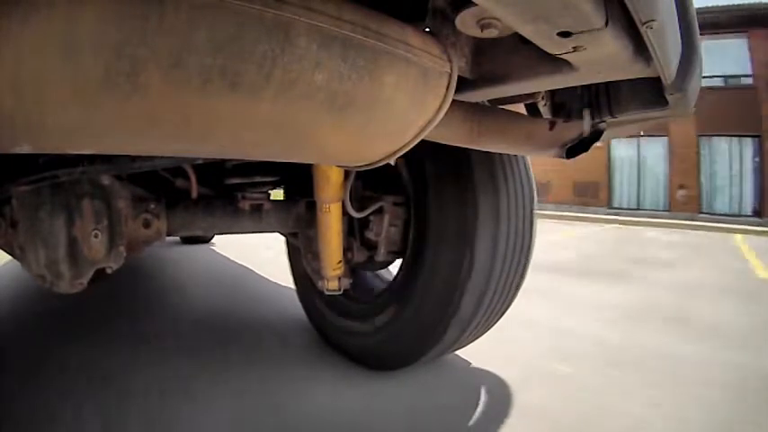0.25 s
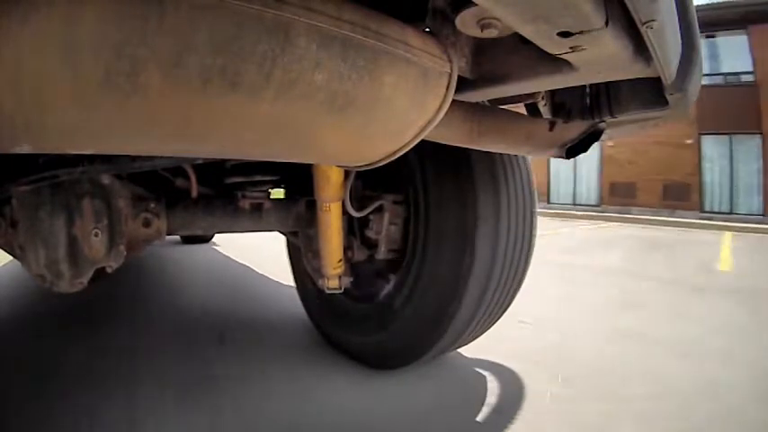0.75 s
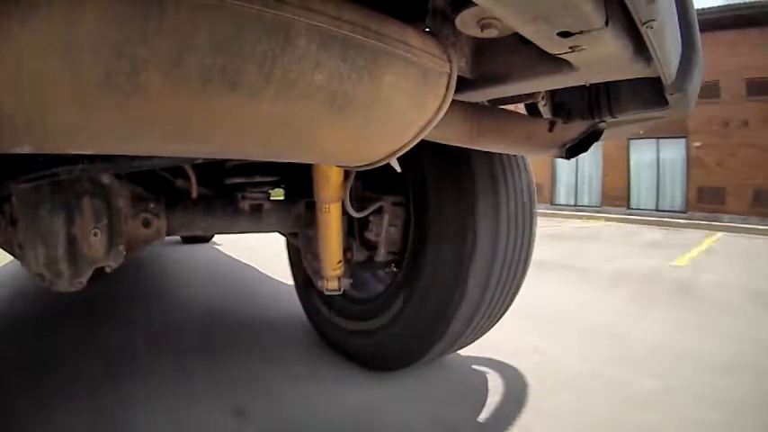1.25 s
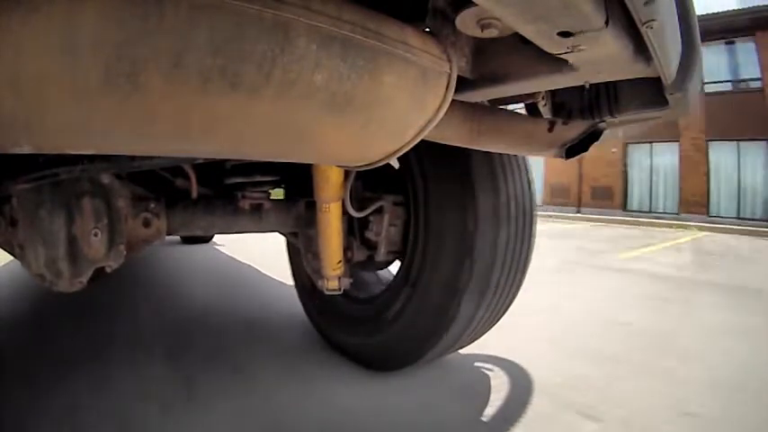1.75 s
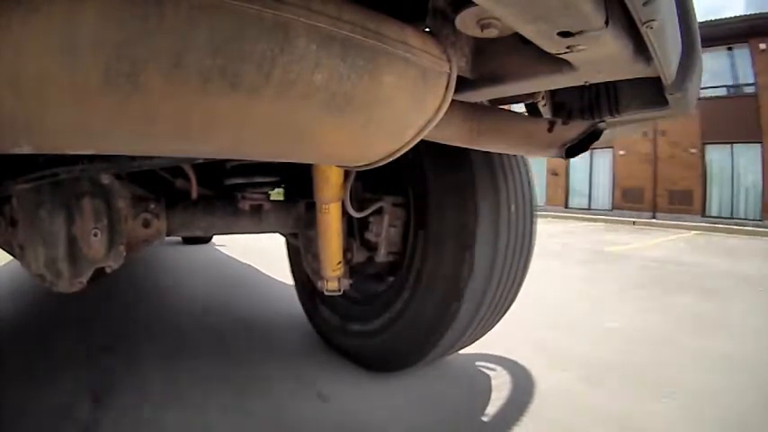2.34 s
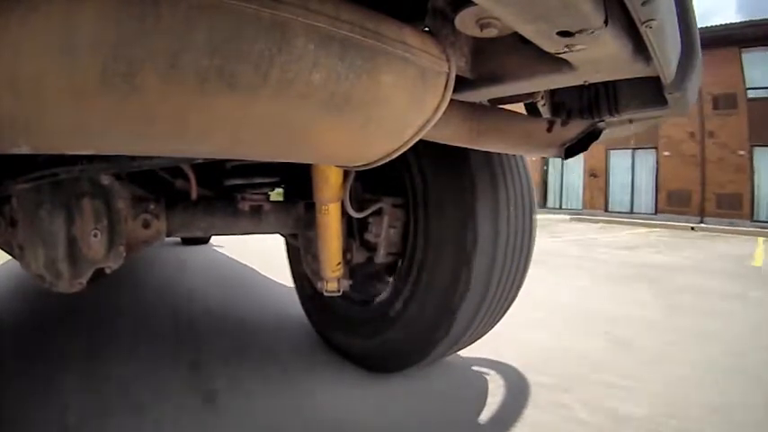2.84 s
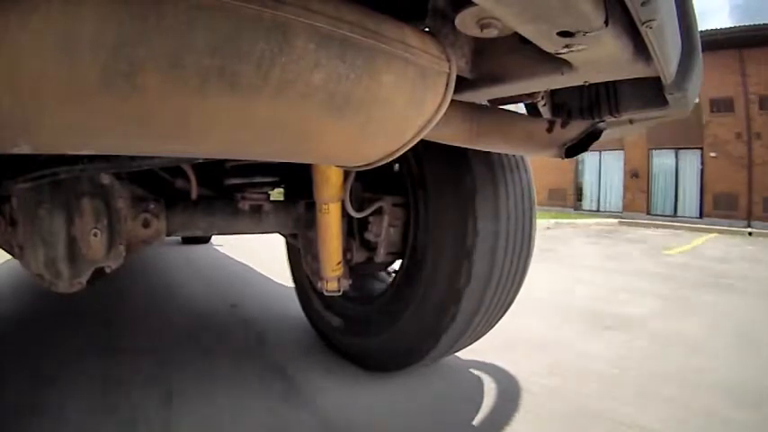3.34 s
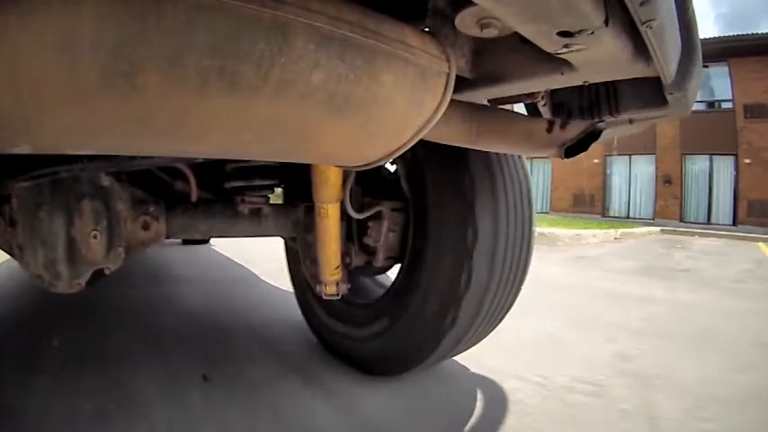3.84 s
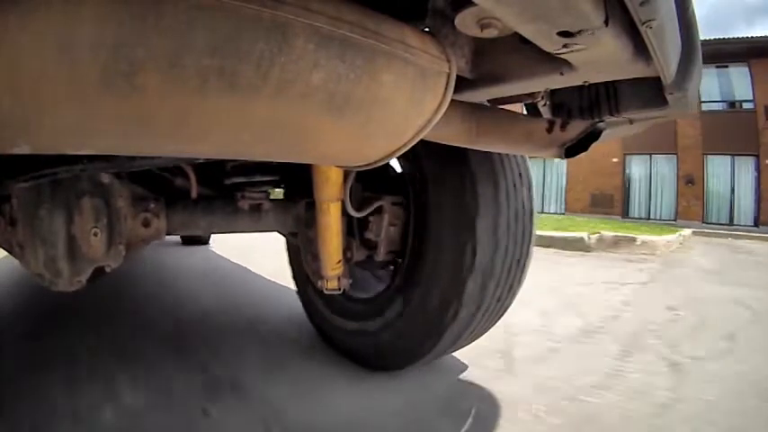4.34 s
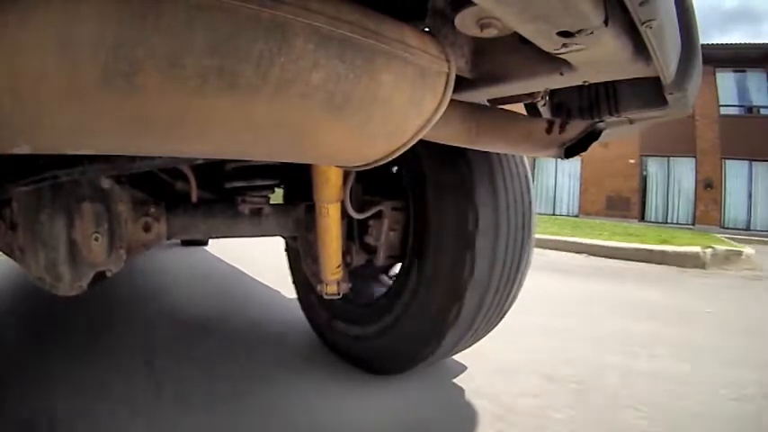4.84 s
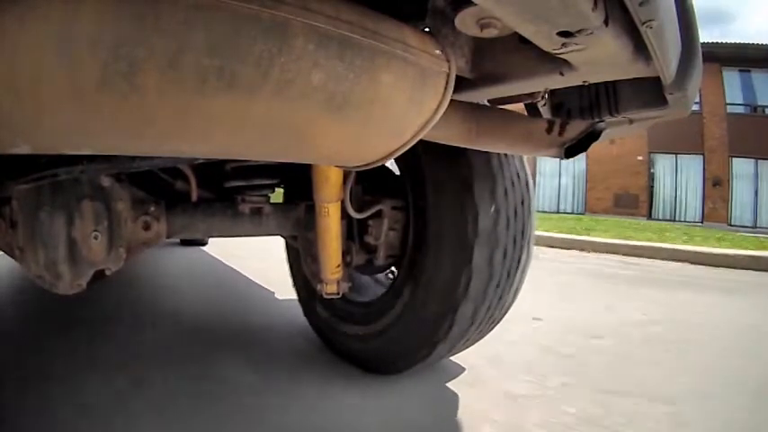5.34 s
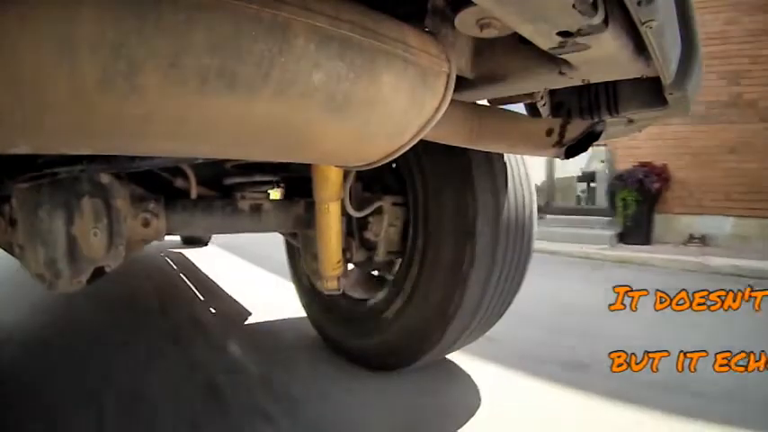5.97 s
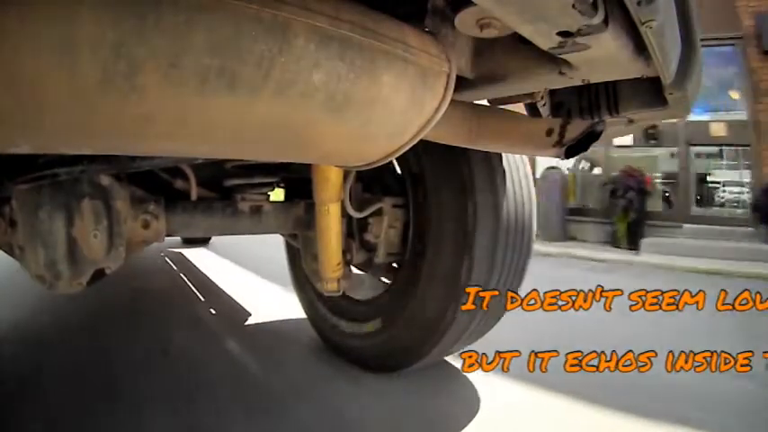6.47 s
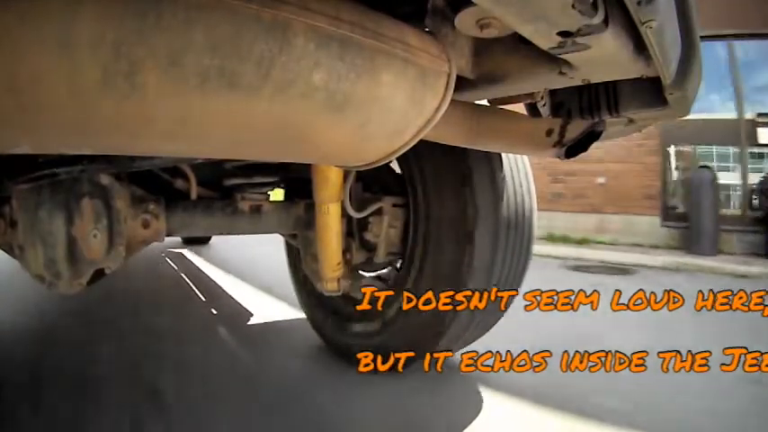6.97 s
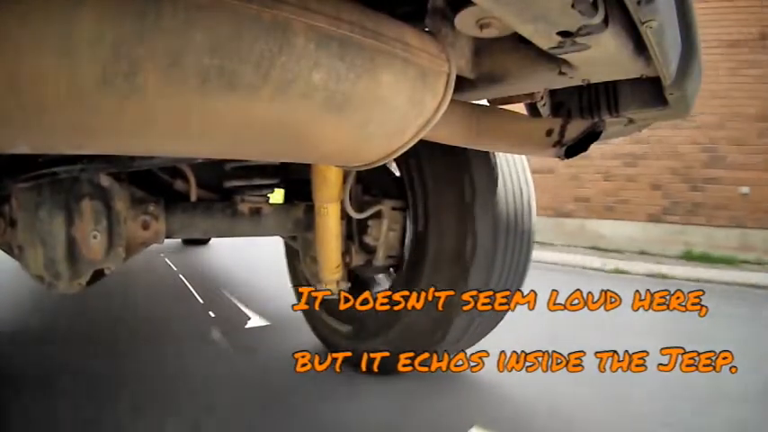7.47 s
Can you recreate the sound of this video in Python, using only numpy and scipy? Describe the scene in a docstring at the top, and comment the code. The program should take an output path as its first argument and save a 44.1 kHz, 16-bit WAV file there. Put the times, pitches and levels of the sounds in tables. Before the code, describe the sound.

An off-road car rolls slowly over pavement, heard from a microphone close under its rear. The exhaust throbs low while the underbody hums and booms, and the tyres hiss with grit. A faint gear whine comes and goes. Loose suspension joints knock and clank, first after about a second, hardest just before two seconds, then in scattered groups, with a longer run near the end.

```python
"""A slowly rolling off-road car, close up, from a camera microphone clamped under its rear.
From the start road shake booms in axle and silencer and sings in the narrow resonances of the camera
bracket; the exhaust throbs low, the tyres hiss with grit and a faint gear whine comes and goes.
Loose suspension joints knock over the bumps: first at 1 s, hardest just before 2 s, then in scattered
groups, with a longer run from 5.6 to 7 s."""
import sys
import numpy as np
from scipy import signal
from scipy.fft import rfft, irfft, next_fast_len
from scipy.io import wavfile

SR = 44100
rng = np.random.default_rng(int(sys.argv[2]) if len(sys.argv) > 2 else 0)


def inscribe(sig):
    """Save sig as 16-bit PCM at rate SR to the path in sys.argv[1].

    A 1-D sig is mono; a 2-D sig holds one channel per row.
    Samples are clipped to [-1, 1] before scaling.
    """
    pcm = np.round(np.clip(np.atleast_2d(sig).T, -1, 1) * 32767)
    wavfile.write(sys.argv[1], SR, pcm.astype(np.int16))


N = 339570

# slow levels as road and speed change: time_s, tyre_roar_db, silencer_hum_db, axle_boom_db, grit_db
ROAD_LEVELS = [(0.0, -49, -43.5, -45.5, -65), (0.58, -49, -45.5, -50, -66), (1.22, -50, -48, -51, -67.5),
               (1.52, -49.5, -46.5, -50, -69), (1.91, -50.5, -50.5, -50, -68),
               (2.38, -50.5, -49, -52.5, -67), (2.7, -51.5, -52.5, -50.5, -66.5), (3.3, -52, -48, -54, -68),
               (4.05, -52.5, -46.5, -50.5, -67), (4.8, -53.5, -51.5, -52, -66),
               (6.46, -51, -49.5, -52, -67), (6.75, -52.5, -56.5, -57.5, -67),
               (7.31, -51.5, -53.5, -50, -64.5), (7.7, -53.5, -42.5, -55, -69.5)]
# resonances of the camera bracket: pitch_hz, width_hz, gain_db
BRACKET_MODES = [(1093, 81, -0.5), (1124, 27, 4.5), (1634, 62, -13.5), (1941, 59, 0), (2091, 58, -1),
                 (2494, 129, 2.5), (2718, 38.4, 2), (2864, 128, -4.5), (3386, 97, -6.5), (3776, 79, 0),
                 (3980, 1080, -11.5), (4663, 115, 0.5), (5697, 78, -8.5), (7040, 93, -14.5)]
# resonances of the suspension joints: pitch_hz, width_hz, gain_db
JOINT_MODES = [(333, 77, 6.5), (362.5, 20, 3), (482, 62, -3.5), (533.4, 13.6, 7.5), (576, 23, -0.5),
               (658, 19, 1.5), (709, 23, -0.5)]


def amp(db):
    return 10 ** (np.asarray(db) / 20)


def unit_rms(x):
    return x / np.sqrt(np.mean(x ** 2) + 1e-20)


def curve(rows, column):
    """One column of a table, joined by straight lines in time."""
    table = np.transpose(rows)
    return np.interp(np.arange(N) / SR, table[0], table[column])


def swells(rows, column):
    """Bell-shaped rises in dB about each peak."""
    t = np.arange(N) / SR
    return sum(row[column] * np.exp(-((t - row[0]) / max(row[1], .01)) ** 2) for row in rows)


def wander(rate_hz):
    """Random drift of rms 1, mostly slower than rate_hz."""
    return unit_rms(signal.lfilter(*signal.butter(2, rate_hz, fs=SR), rng.standard_normal(N)))


def coloured(x, spectrum):
    """Filters x by a spectrum scaled to an rms gain of 1."""
    size = next_fast_len(N)
    bin_hz = np.fft.rfftfreq(size, 1 / SR)
    hz, db = np.transpose(spectrum)
    gain = amp(np.interp(np.log(bin_hz + 1), np.log(hz), db))
    return irfft(rfft(x, size) * unit_rms(gain), size)[:N]


def ring(x, modes):
    """Sum of damped resonances (pitch_hz, width_hz, gain_db); white noise keeps about its rms."""
    out, power = np.zeros(len(x)), 0
    for k, (hz, width, db) in enumerate(modes):
        radius = np.exp(-np.pi * width / SR)
        pole = radius * np.exp(2j * np.pi * hz / SR)
        out += (-1) ** k * amp(db) * 2 * signal.lfilter([1 - radius], [1, -pole], x).imag
        power += amp(db) ** 2 * 2 * (1 - radius) / (1 + radius)
    return out / np.sqrt(power)


def add(mix, start_s, sound):
    part = mix[round(start_s * SR):][:len(sound)]
    part += sound[:len(part)]


def gear_whine(pitch_hz=701, base_db=-77):
    """A thin tone from the final drive, wavering with the load."""
    # the whine comes forward: peak_s, half_width_s, rise_db
    rises = [(0.08, .06, 12), (0.41, .06, 13), (0.96, 0.069, 16), (1.1, 0.06, 12), (5.79, 0.14, 13),
             (6.15, .08, 12), (6.52, 0.076, 7), (6.78, .08, 12)]
    cycles = np.cumsum(pitch_hz * (1 + 0.00592 * wander(rate_hz=5.16))) / SR
    level_db = base_db + swells(rises, column=2) + 2.2 * wander(rate_hz=6.6)
    return amp(level_db) * np.sin(2 * np.pi * cycles)


def grit(small_spurts_per_s=4.5, small_spurt_db=-67, rise_s=0.0037, fall_s=0.013):
    """Sand under the tread: a hiss that flutters and spurts, low and high treble partly on their own."""
    # spectrum of the hiss: frequency_hz, density_db
    hiss_spectrum = [(3000, -16.5), (6000, 1.5), (8000, 1.5), (8500, 3), (9200, -1.5), (10000, 1),
                     (10600, -3.5), (13000, -7.5), (13800, -6), (14200, -2.5), (14700, -22.5), (15500, -14)]
    # loudest spurts of sand: start_s, strength_db
    loud_spurts = [(0.3302, -66), (0.6185, -57), (1.7145, -56), (1.8717, -52), (2.2404, -58), (2.5157, -64),
                   (2.8118, -63), (3.1401, -58), (3.327, -59), (4.602, -67), (5.1383, -59), (5.7444, -60),
                   (5.969, -55), (6.4104, -57), (7.073, -56), (7.239, -62)]
    flutter_db = 1.23 * wander(rate_hz=7.8) + 1.2 * wander(rate_hz=54) + 1.7 * wander(rate_hz=280)
    low, high = (amp(flutter_db + 0.5 * wander(rate_hz=17)) * rng.standard_normal(N) for _ in range(2))
    crossover = signal.firwin(63, 10500., fs=SR)
    hiss = np.convolve(low - high, crossover, "same") + high
    strengths = amp(small_spurt_db + 2.0 * rng.standard_normal(N))
    onsets = strengths * (rng.random(N) < small_spurts_per_s / SR)
    for start_s, strength_db in loud_spurts:
        add(onsets, start_s, amp([strength_db]))
    t = np.arange(SR // 5) / SR
    spurt_shape = (1 - np.exp(-t / rise_s)) * np.exp(-t / fall_s)
    spurts = signal.oaconvolve(onsets, spurt_shape)[:N]
    return np.hypot(amp(curve(ROAD_LEVELS, column=4)), spurts) * unit_rms(coloured(hiss, hiss_spectrum))


def exhaust():
    """Uneven firing: a wavering low tone and a pipe rumble about it."""
    # the engine's pulse at the pipe: time_s, firing_hz, level_db
    firing = [(0.0, 58.4, -49), (0.3, 61.5, -58), (0.71, 54.1, -51.5), (1.18, 48.6, -53), (1.67, 47, -58),
              (2.2, 63.9, -52), (2.57, 62.4, -56), (2.74, 54.1, -57), (3.43, 56.5, -55), (3.97, 59.6, -56),
              (4.59, 49.1, -50.5), (4.8, 50.5, -62), (5.1, 53.7, -56), (5.45, 54.7, -57), (5.7, 57, -52),
              (6.3, 51.8, -54), (6.97, 49, -50), (7.7, 44, -50.5)]
    # brief swells and one dip in the throb: peak_s, half_width_s, rise_db
    surges = [(0.11, .07, 6), (3.13, 0.089, 9), (3.73, 0.081, 10), (4.4, 0.18, 3), (4.98, 0.072, 8.5),
              (7.05, 0.088, -2)]
    firing_hz = curve(firing, column=1) * (1 + 0.024 * wander(rate_hz=11.0))
    phase = 2 * np.pi * np.cumsum(firing_hz) / SR
    tone = amp(2.0 * wander(rate_hz=16.7)) * np.sin(phase)
    rumble = ring(ring(rng.standard_normal(N), [(56, 15, 0)]), [(56.4, 34, 0)])
    level_db = curve(firing, column=2) + swells(surges, column=2)
    return amp(level_db) * unit_rms(unit_rms(tone) + amp(0.5) * unit_rms(rumble))


def tyres(mean_wash_db=-54):
    """Tread noise: a wide wash through the air and the same shake singing in bracket and joints."""
    # spectrum of the airborne wash: frequency_hz, density_db
    wash_spectrum = [(20, -7.5), (60, -2), (100, 2.5), (200, -6), (330, -11), (560, -12.5), (850, -16.5),
                     (1500, -18), (2400, -23), (4500, -14), (5300, -24), (7000, -27), (10000, -65),
                     (16000, -32)]
    roar_db = curve(ROAD_LEVELS, column=1)
    roughness = amp(0.53 * wander(rate_hz=54))
    bracket = ring(roughness * rng.standard_normal(N), BRACKET_MODES)
    bracket = unit_rms(bracket * amp(0.83 * wander(rate_hz=9.5)))
    joints = amp(-10) * unit_rms(ring(roughness * rng.standard_normal(N), JOINT_MODES))
    wash = unit_rms(coloured(roughness * rng.standard_normal(N), wash_spectrum))
    wash_db = mean_wash_db + .5 * (roar_db - roar_db.mean())
    return amp(roar_db) * bracket + amp(wash_db) * (wash + joints)


def chassis():
    """Road shake hums in the silencer and booms in the axle; ringing twice keeps each band narrow."""
    # resonance of the silencer: pitch_hz, width_hz, gain_db
    silencer_modes = [(138.2, 13.7, 0)]
    # resonances of the axle: pitch_hz, width_hz, gain_db
    axle_modes = [(160.7, 27.2, 1.5), (202, 16, -22), (231.1, 17, -14.5)]
    # an uneven throb, about six a second: time_s, phase_cycles, depth_db
    throb = [(0.0, 0.17, -1.5), (0.83, 5, 2.5), (1.85, 10.8, 1.5), (2.62, 20, 0), (3.16, 19.1, -1),
             (3.8, 24, 2.5), (4.48, 27.6, 0), (4.89, 33, 4), (5.08, 23.4, -6), (5.84, 33, 6.5),
             (6.5, 35.6, -2.5), (6.91, 41, 7), (7.36, 44, 0.5), (7.7, 45.5, 1)]
    # bumps that shake the chassis: peak_s, half_width_s, hum_rise_db, boom_rise_db
    bumps = [(0.06, 0.068, 5.5, -3), (0.28, 0.07, 7.5, -4), (0.82, 0.022, 10, 7), (1.22, 0.11, 9, 6),
             (1.85, 0.043, 10, 13.5), (1.93, 0.038, 16.5, 7), (2.2, 0.11, 6.5, -2.5), (3.79, 0.021, 6, 0),
             (4.33, 0.038, 6, 1.5), (5.64, 0.055, 1, 5.5), (6.52, 0.085, 9, 2), (7.12, 0.053, 10, 5)]
    hum = signal.hilbert(ring(ring(rng.standard_normal(N), silencer_modes), [(136.4, 12.0, 0)]))
    envelope = abs(hum)
    hum = hum.real / (envelope + 0.27 * envelope.mean()) ** 0.94  # steadied, so the road sets the swells
    boom = sum(ring(ring(rng.standard_normal(N), [mode]), [mode]) * amp(mode[2]) for mode in axle_modes)
    throb_db = curve(throb, column=2) * np.cos(2 * np.pi * curve(throb, column=1))
    throb_db += 1.36 * wander(rate_hz=7.1)
    hum_db = curve(ROAD_LEVELS, column=2) + swells(bumps, column=2) + throb_db
    boom_db = curve(ROAD_LEVELS, column=3) + swells(bumps, column=3) + 0.4 * throb_db
    return amp(hum_db) * unit_rms(hum) + amp(boom_db) * unit_rms(boom)


def struck(contact, modes, noise, scrape):
    """The contact drives every mode at its own pitch, with a share of scraping; peak 1."""
    t = np.arange(len(contact)) / SR
    tones = sum(np.sin(2 * np.pi * hz * t + np.pi * phase) for (hz, _, _), phase in zip(modes, noise))
    sound = ring(contact * (tones + scrape * noise), modes)
    return sound / abs(sound).max()


def suspension_knocks(rise_share=.42, push_lengths=2.63):
    """A loose joint makes brief contact: it thuds and rattles, and the bracket rings and clanks."""
    # knocks over the bumps: start_s, ring_db, thud_db, thud_hz, clank_db, rattle_db, contact_s
    knocks = [(1.0793, -53, -51, 547, -49, -53, 0.01), (1.096, -40.5, -48.5, 328, -41, -40, 0.012),
              (1.7854, -44, -61, 331, -64, -61, 0.0061), (1.818, -46, -32.5, 304, -56, -48, 0.012),
              (1.831, -38.5, -42, 296, -34.5, -45, 0.0072), (1.8498, -44, -38, 355, -37, -43, 0.012),
              (1.868, -35, -61, 296, -36, -38.5, 0.017), (1.877, -31.5, -46.5, 528, -39, -43, 0.0093),
              (2.427, -44, -44.5, 580, -49, -60, 0.011), (2.46, -48, -47.5, 585, -59, -67, 0.012),
              (2.4937, -42, -67, 507, -61, -67, 0.0034), (2.74, -54, -60, 527, -49, -65, 0.0074),
              (3.535, -61, -68, 533, -55, -60, 0.0071), (4.398, -49.5, -50, 313.5, -43, -69, 0.022),
              (4.418, -41.5, -41, 328, -50, -58, 0.0098), (4.533, -53, -70, 328, -60, -53, 0.0098),
              (4.549, -42, -57, 525, -41.5, -51, 0.011), (5.63, -46.5, -51, 580, -46, -55, 0.012),
              (5.651, -48, -55, 318, -50.5, -51, 0.015), (5.839, -40, -47, 460, -47, -64, 0.008),
              (6.198, -44.5, -52, 532, -89, -61, 0.01), (6.2455, -41, -56, 541, -41, -46, 0.0065),
              (6.283, -39, -44.5, 584, -41, -63, 0.013), (6.3092, -45, -53, 307, -46, -56, 0.013),
              (6.448, -43.5, -54, 300, -49, -53, 0.013), (6.49, -55, -43.5, 396, -45, -59, 0.011),
              (6.662, -48.5, -63, 530, -62, -62, 0.007), (6.99, -59, -66, 532, -50, -60, 0.0076)]
    metal, rattle = np.zeros((2, N))
    # spectrum of the rattle: frequency_hz, density_db
    rattle_spectrum = [(1500, 2.5), (2600, 12.5), (3400, 12), (4900, 6.5), (5500, 1), (8000, -10.5),
                       (12000, -24), (16000, -40)]
    t = np.arange(SR // 8) / SR
    for start_s, ring_db, thud_db, thud_hz, clank_db, rattle_db, contact_s in knocks:
        noise = rng.standard_normal((4, len(t)))
        progress = t / np.clip(rise_share * contact_s, .001, .02)
        contact = progress * np.exp(1 - progress)  # builds up, then lets go
        bracket_push = np.sin(np.pi * np.minimum(t / (push_lengths * contact_s), 1) ** 0.51)
        # the struck spot favours the modes near the thud's pitch
        near_modes = [(hz, width, db - 51.0 * abs(np.log2(hz / thud_hz)))
                      for hz, width, db in JOINT_MODES]
        add(metal, start_s, amp(ring_db) * struck(bracket_push, BRACKET_MODES[:1], noise[0], scrape=2.7))
        add(metal, start_s, amp(thud_db) * struck(contact ** 2.1, near_modes, noise[1], scrape=2.0))
        clank = struck(contact ** 0.45, BRACKET_MODES[2:5], noise[2], scrape=23.0)
        add(metal, start_s, amp(clank_db) * clank)
        add(rattle, start_s, amp(rattle_db) * contact ** 0.63 * noise[3])
    return metal + coloured(rattle, rattle_spectrum)


def scene():
    """Everything reaches one microphone, close under the car."""
    return (chassis() + exhaust() + gear_whine() + tyres() + grit() + suspension_knocks())[None]


def record(dry, low_cut_hz=30., top_hz=15300):
    """The camera microphone rolls off the deep bass and cuts the highest treble."""
    thinned = signal.lfilter(*signal.butter(2, low_cut_hz, "high", fs=SR), dry)
    band_limit = signal.firwin(1023, top_hz, window=("kaiser", 10), fs=SR)
    return signal.oaconvolve(thinned, band_limit[None], "same")


dry = scene()
out = record(dry)
inscribe(out)
```